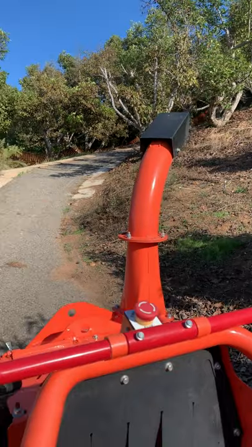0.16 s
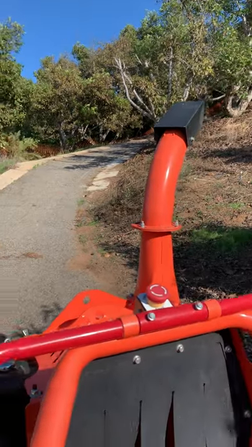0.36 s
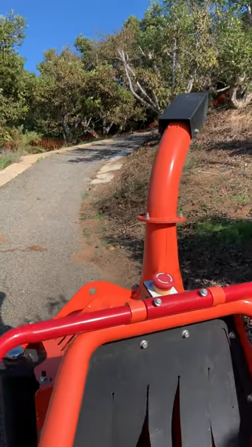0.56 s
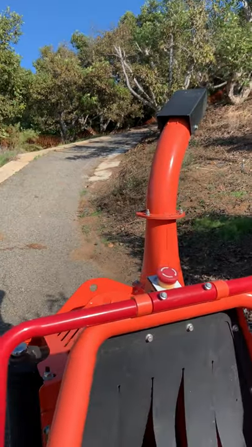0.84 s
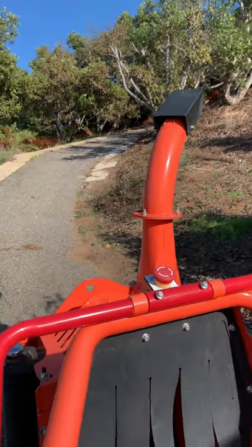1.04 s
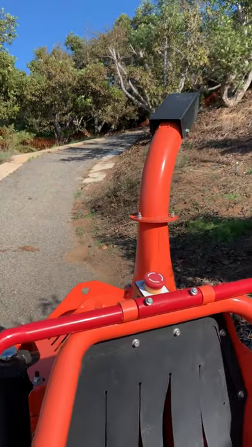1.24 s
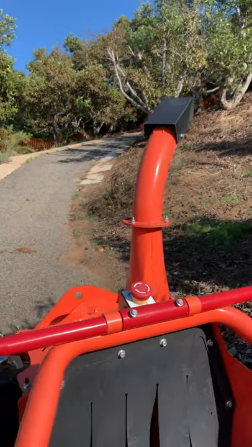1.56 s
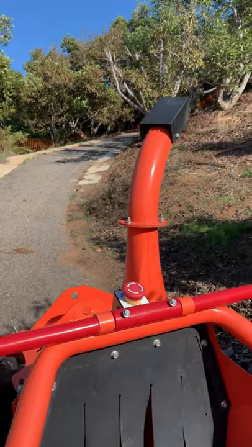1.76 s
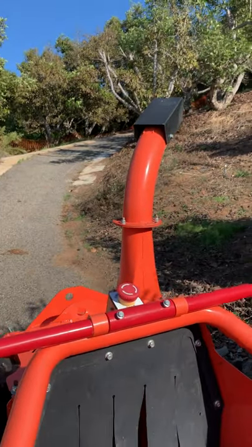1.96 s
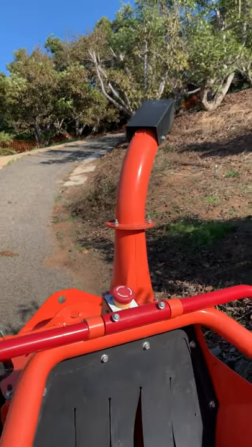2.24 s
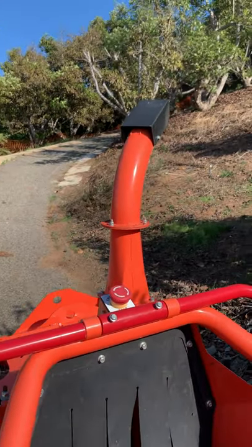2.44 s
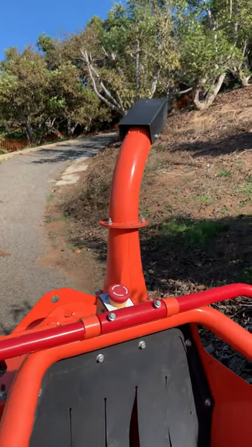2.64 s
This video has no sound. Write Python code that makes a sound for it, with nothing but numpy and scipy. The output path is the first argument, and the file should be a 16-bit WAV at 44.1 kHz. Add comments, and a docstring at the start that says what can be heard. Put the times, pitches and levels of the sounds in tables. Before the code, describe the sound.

A wood chipper drones throughout at constant speed, close and outdoors: deep buzzing blade hum with a slightly wavering swell, engine throb and low air roar. Loose chips clack and rattle against steel, densely from 0.3 to 0.75 seconds, again around 1.0 to 1.5, with a sharp knock near 1.4. Later strikes are sparser, with hard ones near 1.85, 2.4 and 2.6. It does not stop.

```python
"""A steady hum of rotor blades runs throughout, with engine throb and air roar: a wood chipper idling
at full speed outdoors, heard from the feed hopper. The blades give harmonics of the blade-pass rate,
the engine tones at multiples of its own firing rate, and the air bands of noise that flicker and pulse.
Loose chips are struck now and then and rattle up the steel chute: impulses and noise excite resonances."""
import sys
import numpy as np
from scipy import signal
from scipy.fft import rfft, irfft
from scipy.io import wavfile

SR = 44100
rng = np.random.default_rng(int(sys.argv[2]) if len(sys.argv) > 2 else 0)


def wrap_up_sound(samples):
    """Save the sound to the file named by the first command line argument, as 16-bit audio."""
    columns = np.atleast_2d(samples).T
    # keep every value between -1 and 1, then stretch to whole-number steps
    tamed = np.clip(columns, -1, 1)
    steps = np.round(tamed * 32767).astype(np.int16)
    wavfile.write(sys.argv[1], SR, steps)


N = 123921

# Harmonics of the blade pass: [multiple of the pass rate, rms level/dB]
BLADE_HARMONICS = [(1, -33), (2, -20.5), (3, -29), (4, -28), (5, -36.5), (6, -43), (7, -27.5), (8, -44.5),
                   (10, -47), (13, -42), (15, -44), (16, -44.5), (18, -52.5)]
# Swell of the second blade harmonic, used about its mean: [t/s, level/dB]
HOUSING_SWELL = [(0.0, -22), (0.1, -20), (0.14, -24.5), (0.31, -17.5), (0.37, -22.5), (0.8, -16),
                 (0.92, -27.5), (0.98, -18.5), (1.38, -20), (1.41, -21), (1.67, -23), (1.84, -15.5),
                 (1.92, -18.5), (2.39, -17), (2.46, -25), (2.52, -17.5), (2.75, -15), (2.81, -26)]
# Engine tones: [multiple of the firing rate, rms level/dB]
ENGINE_TONES = [(2, -33), (3, -41.5), (9.42, -39), (36.5, -45.5)]
# Chips struck: [t/s, peak level of the crack/dB, rms levels of thud, knock, rattle and hiss/dB,
# f of thud, knock and crack/Hz, decay time constant/s]
CHIP_STRIKES = [(0.075, -27, -26, -29, -39.5, -42, 722, 2450, 3800, 0.026),
                (0.163, -27, -45, -32, -37, -36.5, 810, 2300, 3880, 0.019),
                (0.2466, -30, -27, -29, -40.5, -45, 740, 2130, 3970, 0.02),
                (0.348, -26.5, -34, -28.5, -36, -39, 744, 1360, 3830, 0.033),
                (0.397, -20, -41, -30, -22.5, -27, 980, 1750, 4540, 0.013),
                (0.42, -28, -24.5, -27, -39, -42, 477, 1300, 3950, 0.025),
                (0.4375, -28, -41, -29, -31.5, -37, 504, 1760, 4570, 0.07),
                (0.475, -24.5, -37, -22, -30.5, -32, 940, 2500, 3640, 0.022),
                (0.527, -23, -32, -24, -33, -36.5, 700, 2090, 4230, 0.029),
                (0.5442, -18, -19.5, -14, -44, -47, 326, 2030, 4485, 0.013),
                (0.599, -31, -31, -36, -39, -35.5, 567, 1490, 3440, 0.028),
                (0.7083, -23, -23, -27, -31, -36, 499, 2540, 4040, 0.028),
                (0.725, -17, -30, -19, -26.5, -30, 326, 2520, 3700, 0.017),
                (0.746, -41, -32, -34, -30.5, -27, 614, 2570, 3730, 0.012),
                (0.97, -23, -45, -34, -33.5, -37.5, 790, 2280, 3800, 0.015),
                (1.02, -26, -29, -28.5, -38, -42, 457, 1630, 3900, 0.081),
                (1.034, -20.5, -19, -18, -29.5, -33.5, 480, 2270, 4300, 0.019),
                (1.0677, -22, -34, -17, -48, -38, 820, 2140, 3370, 0.018),
                (1.104, -28.5, -28, -33, -36, -41, 687, 2360, 3730, 0.024),
                (1.221, -23.5, -27, -24, -33, -37, 566, 2200, 3200, 0.018),
                (1.3044, -22, -20, -35, -30, -35, 617, 1460, 4370, 0.021),
                (1.404, -20, -18.5, -26, -34.5, -37, 485, 2380, 3270, 0.015),
                (1.42, -10.5, -15.5, -17, -24.5, -28, 550, 2400, 4370, 0.017),
                (1.4288, -30, -27, -14.5, -25.5, -26.5, 517, 2690, 3170, 0.014),
                (1.5124, -23.5, -19, -25, -36, -38, 680, 2300, 3790, 0.021),
                (1.575, -40, -33, -30.5, -27.5, -32, 880, 1520, 4220, 0.0069),
                (1.751, -27.5, -23.5, -28.5, -40.5, -44, 1000, 1630, 3370, 0.064),
                (1.842, -15.5, -18.5, -20.5, -30, -35, 560, 1450, 3120, 0.023),
                (1.852, -26, -18, -23, -28.5, -36, 360, 1470, 4000, 0.011),
                (2.19, -36, -28, -23.5, -39, -44, 926, 1470, 3030, 0.0082),
                (2.4007, -12, -13, -18, -26, -28, 508, 1740, 3530, 0.0082),
                (2.4123, -19, -40, -20.5, -26.5, -29.5, 505, 1700, 3610, 0.027),
                (2.579, -13.5, -24.5, -16.5, -27, -32.5, 470, 1435, 4140, 0.024),
                (2.73, -28.5, -23, -29, -32, -31.5, 498, 1500, 3240, 0.045),
                (2.767, -26, -33, -32, -30, -31.5, 1000, 1840, 3670, 0.017)]
# Tones of a strike, in the order thud, knock, crack: [level against their noise/dB, t60/s]
STRIKE_TONES = [(-8, 0.094), (-11.5, 0.057), (-12, 0.089)]
# Resonances of chute and housing: [f/Hz, level against the strike noise/dB, t60/s]
CHUTE_MODES = [(337, -17, 0.079), (476, -7.5, 0.093), (702, -14.5, 0.051), (1000, -11, 0.015),
               (1525, -15.5, 0.015), (2070, -11.5, 0.01), (2360, -13, 0.014), (3550, -34, 0.078)]
# Colour of the rattle: [f/Hz, relative level per Hz/dB]
RATTLE_SPECTRUM = [(2500, 6), (3600, 0), (4600, -2), (5300, -4), (6800, -0.5), (8500, -2.5), (10000, -10.5),
                   (12500, -10.5), (15500, -13.5)]
# Colour of the roar of air and housing: [f/Hz, relative level per Hz/dB]
ROAR_SPECTRUM = [(38, -50), (52, -22), (100, -3.5), (180, -2), (247, -9), (300, -7.5), (390, -13),
                 (435, -19), (490, -12.5), (620, -13), (800, -20.5), (1000, -17), (1450, -18.5),
                 (2300, -23), (2990, -31.5), (4200, -33.5), (5300, -38), (7000, -34.5), (8800, -39.5),
                 (11000, -39.5), (14000, -48.5), (15900, -26)]
# Course of the roar: [t/s, level/dB]
ROAR_COURSE = [(0, -25), (.4, -23.5), (.9, -24), (1.4, -23.5), (1.9, -24), (2.4, -22.5), (2.81, -22)]
# Two microphone ports: [f/Hz, phase lead of the left/rad, likeness 0-1, left over right level/dB]
PORT_RESPONSE = [(40, 0, 1, 0), (172, -.5, 1, 0), (516, -1.1, .97, -.2), (860, -1.4, .86, -1.4),
                 (1200, -1, .85, -2.1), (1550, 0, .83, -1.7), (1900, .9, .7, -.3), (2600, 2, .74, -2.8),
                 (3100, 2.4, .67, -.4), (3450, 1.9, .6, 1.6), (3950, .6, .7, -1.5), (4400, 1.5, .5, -2.4),
                 (5170, 3.6, .7, -.4), (6200, 5.5, .75, 0), (6720, 6.2, .9, 0), (8270, 7.2, .75, 0),
                 (9100, 7.9, .6, 0), (9820, 9.4, .8, 0), (10400, 6.9, .7, 0), (16000, 7, .75, 0)]

BLADE_HZ, FIRST_BEAT_S = 73.29, .0109
SPEED_WANDER_RAD, HUM_WAVER_DB = 0.12, 0.9
FIRING_HZ, FIRST_FIRING_S = 29.457, .0334
CHIP_ATTACK_S = .0007   # time constant
SPLINTERS_PER_S, SPLINTER_SPREAD_DB = 1400, 2.5
DUST_SHARE = .8   # steady noise against splinters of rms 1
CREST_DB = 8.5   # peak of a crack over its rms
BLOW_DB = 28   # the single blow, over splinters of rms 1
UNEVEN_DB = 2.0   # clumping of the rattle
TAIL_DB, TAIL_S = -14, 0.071   # lingering rattle: level against the burst, time constant
ROAR_PATCHY_DB = 2.27   # spread of the flicker in each band
ROAR_BEAT, ROAR_THROB = 0.038, 0.054   # depth at twice the blade rate, and at the firing rate
CUTOFF_HZ, ROUND_AT = 16250, 1.3


def blades():
    """Periodic pulsation: blade passes give harmonics, the second amplified by the housing's swell."""
    since_beat = np.arange(N) / SR - FIRST_BEAT_S
    turn = 2 * np.pi * BLADE_HZ * since_beat + SPEED_WANDER_RAD * drift(0.33)
    swell = in_time(HOUSING_SWELL)
    hum = 0
    for k, db in BLADE_HARMONICS:
        if k == 2:
            waver_db = swell - swell.mean()
        else:
            waver_db = HUM_WAVER_DB * np.sqrt(k) * drift(13.0)
        # The first and the even harmonics peak together; higher odd ones have random phase
        phase = 2 * np.pi * rng.random() if k % 2 and k > 1 else 0
        hum = hum + from_db(db + waver_db) * np.cos(k * turn + phase)
    return np.sqrt(2) * hum, turn


def engine():
    """Periodic excitation: tones at fixed multiples of the firing rate, each wavering in level."""
    turn = 2 * np.pi * FIRING_HZ * (np.arange(N) / SR - FIRST_FIRING_S)
    tones = 0
    for k, db in ENGINE_TONES:
        tones = tones + from_db(db + HUM_WAVER_DB * drift(4.0)) * np.cos(k * turn)
    return np.sqrt(2) * tones


def splinter_spray():
    """Shot noise: sparse impulses of random size and sign, over a bed of Gaussian noise."""
    struck = rng.random((2, N)) < SPLINTERS_PER_S / SR
    size_db = SPLINTER_SPREAD_DB * np.minimum(rng.exponential(1, (2, N)), 4)
    splinters = struck * from_db(size_db) * rng.choice([-1, 1], (2, N))
    return rms_one(rms_one(splinters) + DUST_SHARE * rng.standard_normal((2, N)))


def chips():
    """Impact excitation: each blow and its dying spray ring strike tones and chute modes, with noise above."""
    t, out = np.arange(N) / SR, np.zeros((2, N))
    spray = splinter_spray()
    power = np.zeros((5, N))   # thud, knock, crack, rattle, hiss
    for s, crack_db, thud_db, knock_db, rattle_db, hiss_db, *tones_hz, length_s in CHIP_STRIKES:
        i = int(s * SR)
        age = t[:min(N - i, SR // 2)]
        span = slice(i, i + len(age))
        rise = 1 - np.exp(-age / CHIP_ATTACK_S)
        burst = rise * np.exp(-age / length_s)
        shape = burst + from_db(TAIL_DB) * rise * np.exp(-age / TAIL_S)
        levels_db = np.array([thud_db, knock_db, crack_db - CREST_DB, rattle_db, hiss_db])
        power[:, span] += (from_db(levels_db)[:, None] * shape) ** 2
        blow = spray[:, span] * burst + 1e-18
        blow[0, int(2 * CHIP_ATTACK_S * SR)] += from_db(BLOW_DB)
        for hz, level_db, (tone_db, t60) in zip(tones_hz, levels_db, STRIKE_TONES):
            out[:, span] += from_db(level_db + tone_db) * ring(blow, hz, t60)
    envelopes = np.sqrt(power)

    bright = colour(spray, RATTLE_SPECTRUM) * from_db(UNEVEN_DB * drift(40))
    bands_hz = [2500, 5100], [5100, 9700], [9700, 16500]   # crack, rattle, hiss
    for envelope, edges in zip(envelopes[2:], bands_hz):
        out += envelope * rms_one(bandpass(bright, 3, edges))

    for k, (hz, db, t60) in enumerate(CHUTE_MODES):
        # Thud drives modes up to 1100 Hz, knock those up to 2900 Hz, crack the rest
        envelope = envelopes[int(hz > 1100) + int(hz > 2900)]
        drive = spray * from_db(db + 1.7 * drift(5.3)) * envelope
        out += (-1) ** k * ring(drive, hz, t60)
    return out


def roar(turn):
    """Broadband flow noise: third-octave bands flicker separately; the whole is amplitude-modulated."""
    edges = 40 * 2 ** np.arange(0, 9.1, 1 / 3)
    shaped = colour(rng.standard_normal((2, 2, N)), ROAR_SPECTRUM)
    noise = 0
    for k, band_edges in enumerate(zip(edges, edges[1:])):
        # Neighbouring bands draw on unrelated noises
        band = bandpass(shaped[k % 2], 2, band_edges)
        noise = noise + band * from_db(ROAR_PATCHY_DB * drift(24))
    beat = ROAR_BEAT * np.cos(2 * turn)
    throb = ROAR_THROB * np.cos(turn * FIRING_HZ / BLADE_HZ)
    return from_db(in_time(ROAR_COURSE)) * rms_one(noise) * (1 + beat + throb)


def ports(shared, apart):
    """Partial coherence: two ports share sound with a frequency-dependent phase, plus an opposed part."""
    hz = np.maximum(np.fft.rfftfreq(N, 1 / SR), 1)
    lead, alike, tilt_db = (at_hz(PORT_RESPONSE, hz, column=k) for k in (1, 2, 3))
    alike = np.clip(alike, 0, 1)
    sign = np.array([[1], [-1]])   # left, right
    common = np.sqrt((1 + alike) / 2) * rfft(shared)
    opposed = sign * np.sqrt((1 - alike) / 2) * rfft(apart)
    response = np.exp(.5j * sign * lead) * from_db(sign * tilt_db / 2)
    return irfft((common + opposed) * response, N)


def ring(x, hz, t60):
    """Damped resonance: a two-pole mode; noise of rms 1 comes out near rms 1."""
    r, w = from_db(-60 / (t60 * SR)), 2 * np.pi * hz / SR
    gain = 2 * np.sin(w) * np.sqrt(1 - r * r)
    return signal.lfilter([0, gain], [1, -2 * r * np.cos(w), r * r], x)


def bandpass(x, order, edges):
    """Band limitation: a Butterworth filter passes the sound between two edges in Hz."""
    return signal.sosfilt(signal.butter(order, edges, "band", fs=SR, output="sos"), x)


def colour(x, spectrum):
    """Spectral shaping: each frequency is weighted by a curve in dB."""
    hz = np.maximum(np.fft.rfftfreq(N, 1 / SR), 1)
    return irfft(rfft(x) * from_db(at_hz(spectrum, hz)), N)


def drift(rate):
    """Slow random fluctuation: noise through a double pole at rate Hz, rms near 1."""
    step = 40   # samples between drawn values
    r = np.exp(-2 * np.pi * rate * step / SR)
    slow = signal.lfilter([1], [1, -2 * r, r * r], rng.standard_normal(N // step + 2002))
    slow = slow[2000:]   # the filter has settled
    return np.interp(np.arange(N) / step, np.arange(len(slow)), rms_one(slow - slow.mean()))


def in_time(rows):
    """Level contour: linear interpolation of dB over time."""
    s, db = np.transpose(rows)
    return np.interp(np.arange(N) / SR, s, db)


def at_hz(points, hz, column=1):
    """Frequency response: interpolation of a table column along log frequency."""
    points = np.array(points)
    return np.interp(np.log(hz), np.log(points[:, 0]), points[:, column])


def from_db(db):
    """Level definition: amplitude ratio of a level in dB."""
    return 10 ** (np.asarray(db) / 20)


def rms_one(x):
    """Normalisation: scale to a root mean square of 1."""
    return x / np.sqrt(np.mean(x ** 2) + 1e-20)


def scene():
    """Superposition: tones are common to both ports, noises partly differ."""
    hum, turn = blades()
    noise = roar(turn) + chips()
    return ports(hum + engine() + noise[0], noise[1])


def record(dry):
    """Saturation and low-pass filtering: the highest peaks are rounded, the top is cut."""
    rounded = ROUND_AT * np.tanh(dry / ROUND_AT)
    return signal.sosfilt(signal.cheby2(12, 70, CUTOFF_HZ, fs=SR, output="sos"), rounded)


dry = scene()
out = record(dry)
wrap_up_sound(out)
```